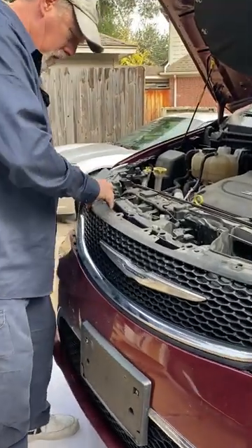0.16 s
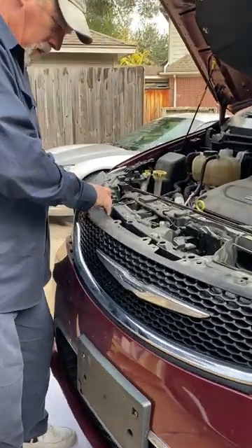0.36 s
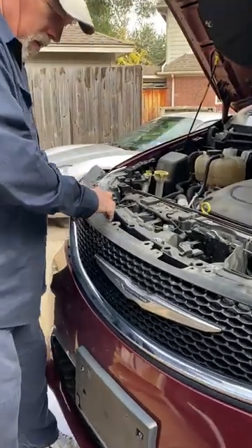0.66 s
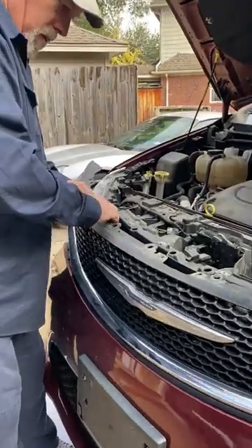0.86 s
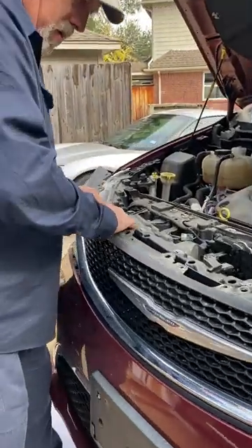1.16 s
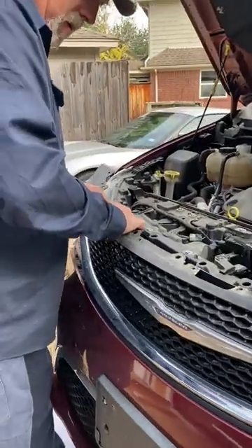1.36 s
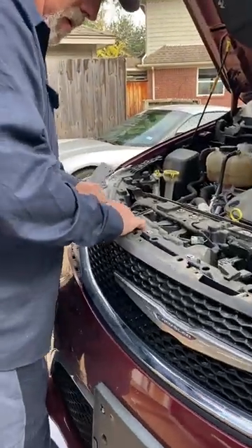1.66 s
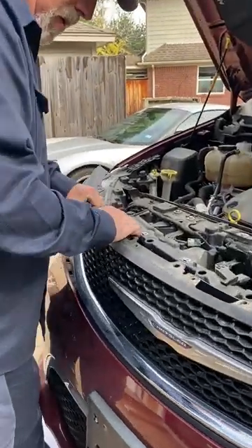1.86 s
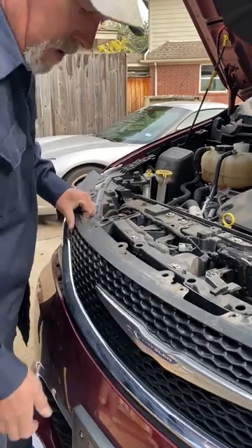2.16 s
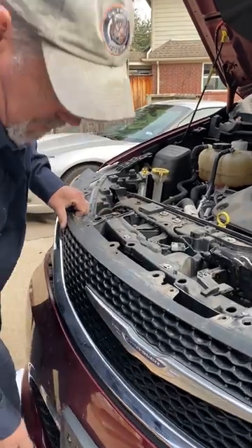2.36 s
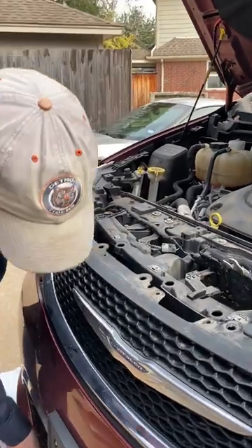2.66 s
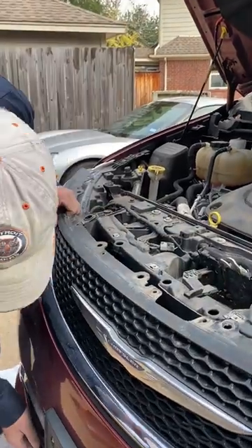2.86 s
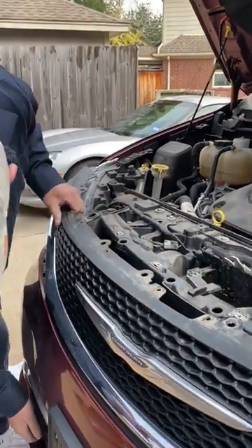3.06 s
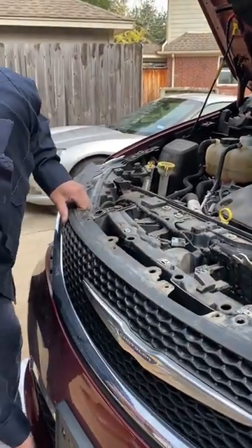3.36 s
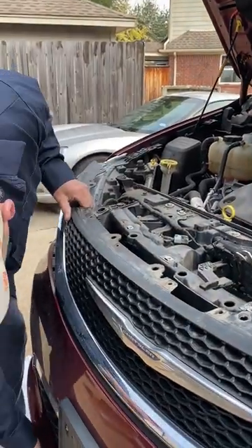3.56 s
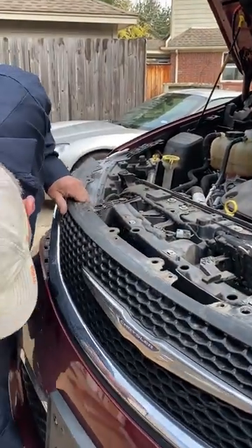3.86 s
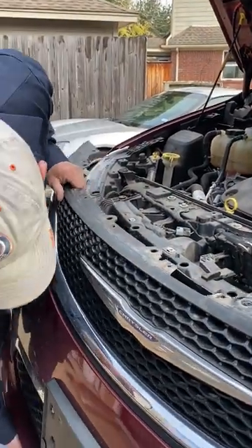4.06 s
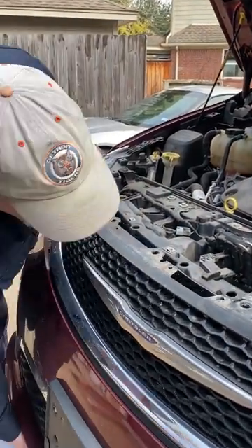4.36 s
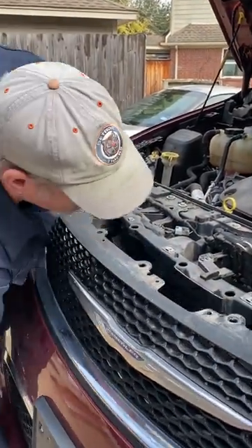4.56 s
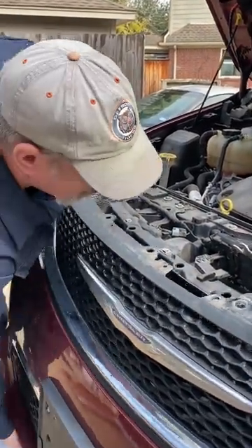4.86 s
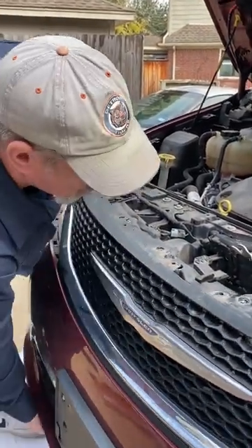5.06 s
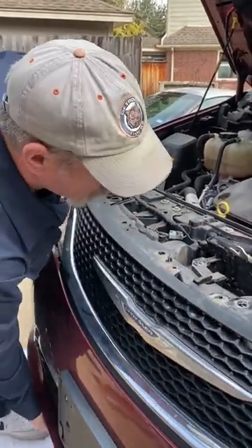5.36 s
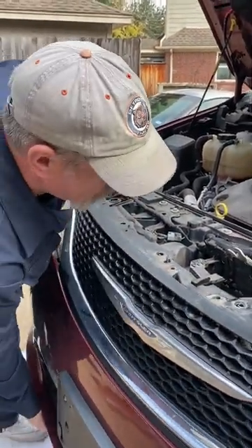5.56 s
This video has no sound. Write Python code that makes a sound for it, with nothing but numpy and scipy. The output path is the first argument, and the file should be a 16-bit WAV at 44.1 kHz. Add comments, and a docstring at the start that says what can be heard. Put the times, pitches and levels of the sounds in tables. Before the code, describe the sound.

Plastic clacks and drums as a panel is pressed onto a car's nose. Irregular single knocks, tiny clip ticks and sleeve rubs come first, with a quiet middle. Then hard cracks of snapping tabs, gritty edge scrapes and a final cluster of low hollow thuds and creaks. Outdoors, fairly dry, with distant traffic and a faint machine hum, heard nearby through a small stereo phone microphone.

```python
"""Open driveway: hands work a plastic bumper panel onto the nose of a car. Snapping tabs and knocks are bursts
of tiny impacts into panel modes; low notes drum in its hollow. Creak, rub and scrapes are coloured grain noise;
a loose edge ticks at random; faint tones glide. Far traffic rumbles as low noise that also carries the panel's
boom near 5.2 s, a machine hums as a wavering sine; a phone hears all through two close ports."""
import sys
import numpy as np
from scipy import signal
from scipy.fft import rfft, irfft
from scipy.io import wavfile
from scipy.ndimage import uniform_filter1d

SR = 44100
rng = np.random.default_rng(int(sys.argv[2]) if len(sys.argv) > 2 else 0)


def store_pcm(level_fs):
    """Save levels as 16-bit WAV."""
    pcm = np.round(np.clip(level_fs, -1, 1) * 32767).astype(np.int16)
    wavfile.write(sys.argv[1], SR, np.atleast_2d(pcm).T)


N = 252247

# low background: (time [s], deep rumble [dB], upper rumble [dB], machine hum [dB]); # the rumble is far
# traffic, and the upper band also carries the panel's boom near 5.2 s
BACKGROUND = [(0.0, -60, -44.5, -55.5), (0.54, -48.5, -55.5, -46), (1.4, -57, -45.5, -46.5),
              (1.72, -53, -56.5, -44), (2.47, -56.5, -45.5, -54.5), (2.85, -45.5, -49, -55.5),
              (3.95, -40.5, -53, -46), (4.33, -48.5, -44, -42), (4.65, -47, -61, -55), (5.19, -53, -29, -44),
              (5.4, -44, -44, -47), (5.72, -60, -40.5, -74)]
HUM_HZ, HUM_WIDTH_HZ = 115.4, 2.94

# creak level as the hands work the panel: (time [s], level [dB])
EFFORT = [(0.0, -49.5), (0.92, -53), (1.32, -53.5), (1.45, -52), (1.74, -57.5), (1.88, -47.5), (2.29, -52),
          (3.41, -56), (3.82, -50), (3.98, -44), (4.09, -46), (4.44, -45.5), (4.75, -49), (4.97, -42.5),
          (5.1, -38), (5.18, -27), (5.37, -45.5), (5.72, -46)]
REST_DB = -47.5   # creak with the hands at rest
AFTER_UNDER_PEAK_DB, AFTER_T60_S = 24, 0.33   # creak left behind by each knock
SWAY_UNDER_EFFORT_DB = 8
# spectrum of flexing plastic: (frequency [Hz], density [dB per Hz])
CREAK_SPECTRUM = [(76, -60), (130, -4), (193, -3.5), (229, -7), (384, -10.5), (1210, -19.5), (2840, -32.5),
                  (5000, -34), (6500, -39), (11000, -120)]
# spectrum of skin and cloth on plastic: (frequency [Hz], density [dB per Hz])
RUB_SPECTRUM = [(1500, 1.5), (2500, 1.5), (4000, 0), (6500, -5.5), (9000, -3), (11500, -9.5),
                (13000, -12.5), (16000, -22)]
RUB_DB, RUB_FOLLOWS = -65, 0.67   # rub at rest; dB of rub per dB of creak
# palms and sleeves sliding: (crest time [s], length [s], rub level [dB])
STROKES = [(0.215, 0.11, -58), (0.46, 0.25, -61.5), (0.701, 0.13, -53.5), (0.92, 0.067, -60.5),
           (1.36, 0.19, -76), (1.752, 0.023, -54), (1.92, 0.068, -50), (2.28, 0.28, -63),
           (2.77, 0.031, -73), (2.86, 0.15, -62), (2.995, 0.045, -59.5), (3.09, 0.021, -63),
           (3.515, 0.18, -64), (3.936, 0.35, -62.5), (4.182, 0.14, -61), (4.566, 0.035, -60),
           (4.723, 0.06, -53), (4.99, 0.42, -56.5), (5.158, 0.084, -63), (5.64, 0.064, -54)]
SWELL_RISE = 0.94   # rise of a stroke or scrape as a share of its fade

# panel modes, each row the centre of a crowd: (frequency [Hz], strength [dB], t60 [s])
PANEL = [(71.1, 12, 0.46), (114.5, 18, 0.089), (188.6, 14, 0.043), (241.7, 1, 0.064), (331.2, 6.5, 0.038),
         (479.4, -7.5, 0.058), (571.7, -6, 0.042), (723.5, 7, 0.03), (903, 10, 0.024), (1156, 5, 0.023),
         (1410, 2, 0.019), (1632, 3, 0.015), (1965, 4, 0.017), (2320, 5.5, 0.013), (2790, 2, 0.004),
         (3300, 12, 0.0043), (3870, 1, 0.0086), (4684, 9, 0.0082), (6033, 17, 0.0061), (7680, 16, 0.0023),
         (7400, -26, 0.0039), (8805, 2.5, 0.01), (10000, 20, 0.002), (9850, 3.5, 0.001),
         (12200, -10, 0.002), (13900, -11, 0.0043)]
CROWD = 9   # close modes per row

# panel contacts: (time [s], peak before knock gain [dB], thump [dB], knock [dB], crack [dB],
#                  favoured pitch [Hz], rattle t60 at 750 Hz [s])
KNOCKS = [(0.0419, -25.5, -20, -15.5, -21.5, 845, 0.052), (0.073, -48, -16, -15, -26, 500, 0.018),
          (0.1, -40, -13, -22, -25, 500, 0.017), (0.125, -24.5, -12, -13.5, -29, 332, 0.018),
          (0.1575, -18.5, -20, -8, -5, 2500, 0.019), (0.161, -14.5, -8.5, -5, -13.5, 320, 0.026),
          (0.218, -21, -28, -13, -7, 6000, 0.017), (0.223, -24, -15, -16, -22, 497, 0.026),
          (0.252, -29, 0.5, -13, -18, 495, 0.082), (0.34, -35.5, 1.5, -13, -7.5, 560, 0.072),
          (0.578, -29, -15, -6.5, -12.5, 865, 0.038), (0.599, -35.5, -13, -15, -8, 600, 0.052),
          (0.754, -37.5, -8.5, -15.5, -11.5, 338, 0.1), (1.111, -27.5, -21, -4.5, -10, 3900, 0.042),
          (1.117, -35, -1, -7, -22, 497, 0.03), (1.138, -33.5, -7, -30, -35, 195, 0.022),
          (1.301, -14, -18, -5.5, -7, 2340, 0.044), (1.308, -17, -18, -16.5, -14, 500, 0.036),
          (1.314, -21, -13, -13, -14, 6000, 0.013), (1.343, -26.5, -10, -8, -38, 318, 0.065),
          (1.695, -24, -22.5, -37, -31.5, 1160, 0.021), (1.722, -35, -1, -27, -34, 900, 0.033),
          (1.746, -28.5, -16.5, -29, -34, 1100, 0.02), (1.765, -24, -14, -11, -22, 1200, 0.021),
          (1.776, -34.5, -8, -4, -26, 700, 0.022), (1.882, -41.5, -23, -6, -14, 2500, 0.02),
          (1.895, -33, -23, -34, -37, 347, 0.016), (1.933, -31, -14, -33, -15, 358, 0.018),
          (1.948, -23, -14, -32, -48, 640, 0.09), (1.97, -17, -16, -9, -8, 480, 0.04),
          (1.999, -31, -18, -8, -30, 210, 0.025), (2.149, -37.5, -29, -7, -17, 254, 0.04),
          (2.559, -24.5, -21, -16, -15, 774, 0.02), (2.749, -38, -7, -11.5, -15, 780, 0.038),
          (2.806, -44, -23, 5, 4, 3000, 0.015), (2.853, -40, 1, -27, -27, 414, 0.015),
          (2.969, -47.5, -26, -19, -22, 800, 0.022), (3.15, -34.5, -15, -18, -20.5, 420, 0.046),
          (3.391, -38.5, 16, -6, -8, 195, 0.045), (3.783, -31.5, -11.5, -21, -33, 352, 0.051),
          (3.865, -14.5, -12.5, -10.5, -4, 278, 0.02), (3.881, -24, -10, -11, -15, 240, 0.027),
          (3.9004, -10, -17, -5.5, -7.5, 2470, 0.028), (3.973, -30, -20, -14, -13, 4000, 0.022),
          (3.977, -22, -2, -16, -25, 323, 0.022), (3.987, -31.5, -14, -13, -15, 305, 0.026),
          (4.027, -29.5, -11, -24, -52, 270, 0.028), (4.072, -26.5, -11, -26, -42, 342, 0.018),
          (4.116, -36.5, -6, -10, -16, 500, 0.013), (4.155, -3, -11, -11.5, -10, 526, 0.03),
          (4.173, -7, -24.5, -5, -2, 440, 0.011), (4.184, -26, -10, -10, -10, 500, 0.018),
          (4.207, -18, 2, 5, -6, 2000, 0.0073), (4.254, -20.5, -6.5, -5.5, -4.5, 270, 0.049),
          (4.2704, -26.5, 4, 1.5, -4, 2000, 0.02), (4.291, -31, 3, -5, -13, 2200, 0.02),
          (4.31, -12, -2.5, 12, 10.5, 1750, 0.0029), (4.365, -29, 0, -4, -26, 325, 0.063),
          (4.413, -30, 0.5, 3, -28, 1790, 0.0033), (4.426, -27.5, -15, -9.5, -32, 1820, 0.0046),
          (4.456, -34.5, -2, -7, -28, 1000, 0.02), (4.516, -26.5, -38, -23, -31, 1110, 0.016),
          (4.525, -34, -22, -22, -25, 1000, 0.017), (4.5396, -24, -18, -9, -23, 1290, 0.0098),
          (4.5648, -14.5, -39, -4, -8, 1430, 0.0098), (4.567, -5.5, -43, -5, 4, 6000, 0.016),
          (4.579, -24, -25, 1, -12, 1600, 0.03), (4.597, -32, 6, -17, -21, 250, 0.012),
          (4.682, -33.5, -19, -26, -16, 358, 0.024), (4.71, -19.5, -13, -5.5, -10, 350, 0.023),
          (4.914, -46, -20, -5, -25, 1500, 0.012), (4.92, -23.5, -14, -22, -50, 655, 0.033),
          (4.954, -12, -34, -12, -25, 640, 0.026), (4.985, -23, -14, -24, -43, 202, 0.018),
          (5.03, -21.5, -7, -17, -22, 250, 0.023), (5.037, -14.5, -13, -20, -28, 700, 0.015),
          (5.044, -19, -8, -25, -28, 400, 0.018), (5.05, -16.5, 1, -25, -34, 250, 0.025),
          (5.0625, -16, -12, -16, -21, 500, 0.026), (5.069, -15.5, -23, -32, -37, 440, 0.021),
          (5.085, -20, -2, -27, -32, 267, 0.038), (5.119, -17.5, -26, -5, -7.5, 900, 0.015),
          (5.125, -8, -17.5, -24, -25, 506, 0.013), (5.131, -18, -12, -33, -18, 383, 0.054),
          (5.152, -16.5, -13, -20, -9.5, 3570, 0.041), (5.179, -14, -8, -10.5, -11.5, 670, 0.062),
          (5.189, -27, -10, -5.5, -9, 202, 0.014), (5.223, -21.5, 4, -6, -29, 360, 0.035),
          (5.244, -26.5, -15, -3, -7, 3200, 0.023), (5.258, -26, -15, 4, -7, 3200, 0.026),
          (5.307, -23, -4, -20, -13, 646, 0.025), (5.318, -11.5, -7.5, -9.5, -11, 370, 0.041),
          (5.363, -26, -8, -1, -17, 2100, 0.021), (5.414, -26.5, 1, -36, -31, 253, 0.13),
          (5.49, -36, -10, -18, -16, 700, 0.015), (5.502, -23.5, -3.5, -6, -1, 630, 0.027),
          (5.513, -32, 15, -22, -30, 322, 0.012), (5.58, -23.5, -12, -17, -24, 564, 0.033),
          (5.583, -17, -16.5, -19, -13.5, 564, 0.053), (5.601, -21, -23, -11.5, -29, 500, 0.062),
          (5.649, -24.5, 4, -30, -18, 225, 0.0088)]
# centres of boom, thump, body, knock, crack and fizz: (frequency [Hz])
COLOUR_HZ = [110, 280, 750, 2100, 5000, 10000]
BODY_DB, BOOM_DB, FIZZ_UNDER_CRACK_DB = -12, -29.5, 10   # same for every knock
FIZZ_PER_DB = 0.1267   # harder knocks fizz more
# light bright ticks of the small clips: (time [s], peak before knock gain [dB])
TICKS = [(0.877, -50), (0.8949, -36.5), (1.039, -44.5), (1.0683, -41), (1.086, -43), (1.2003, -45),
         (1.2127, -44), (1.228, -47), (1.28, -44), (1.87, -43.5), (2.624, -35), (2.9326, -36.5),
         (3.52, -49), (4.143, -39), (4.467, -44), (4.6384, -33), (4.739, -32.5), (4.903, -34.5)]
# colour of those ticks, one per COLOUR_HZ: (level [dB])
TICK_COLOUR_DB = [-4, -34, -29, -11.5, -9, -4.5]
TICK_PITCH_HZ, TICK_RATTLE_S = 4640, 0.013
RISE_SHARE = 0.06   # rise time constant as a share of the rattle
FIRST_BLOW_S, FIRST_BLOW_DB = 0.0008, -5.5   # delay; level against the whole chatter
CRISP_RATTLE_S = 0.02   # longer rattles have a softer first blow
TREBLE_DIES_SOONER = 0.056   # power of frequency by which the rattle shortens
FAVOUR_DB, FAVOUR_OCTAVES = 7, 0.3   # lift near a low favoured pitch; its width
EVEN_ABOVE_HZ = 650   # higher modes alternate in sign and blend into an even clack

# plastic edges scraping: (crest time [s], length [s], dull level [dB], bright level [dB])
SCRAPES = [(0.079, 0.023, -47, -60), (0.148, 0.041, -42, -52), (0.203, 0.064, -40.5, -47.5),
           (0.24, 0.066, -39.5, -55), (1.15, 0.049, -50.5, -66), (1.33, 0.027, -35.5, -40.5),
           (1.364, 0.073, -46, -52.5), (1.73, 0.058, -52, -73), (1.779, 0.043, -46.5, -67),
           (1.9, 0.03, -49.5, -74), (1.942, 0.023, -36, -49), (1.985, 0.082, -44.5, -53.5),
           (2.584, 0.049, -49, -59), (3.862, 0.014, -44, -41), (3.914, 0.031, -41.5, -40),
           (3.988, 0.032, -33, -47), (4.176, 0.033, -36, -29.5), (4.283, 0.12, -46, -50.5),
           (4.37, 0.039, -45, -55), (4.451, 0.042, -47.5, -73), (4.51, 0.026, -44, -54.5),
           (4.548, 0.018, -37, -49), (4.557, 0.0086, -50, -41), (4.579, .02, -53, -50),
           (4.586, 0.055, -61, -53), (4.712, 0.015, -50, -38.5), (4.732, 0.065, -43, -61),
           (4.935, 0.028, -39, -59), (4.976, 0.046, -34.5, -48), (5.031, 0.038, -32, -44),
           (5.07, 0.021, -24.5, -36), (5.128, 0.019, -23.5, -40), (5.157, 0.014, -24, -31.5),
           (5.175, 0.054, -30, -51), (5.263, 0.022, -36, -46), (5.323, 0.01, -23, -24),
           (5.351, 0.043, -32.5, -63), (5.603, 0.015, -43, -39), (5.635, 0.025, -31.5, -48),
           (5.667, 0.054, -44.5, -61)]
# dull scrape spectrum: (frequency [Hz], density [dB per Hz])
DULL_SPECTRUM = [(250, 6), (500, 6), (1000, 1), (2000, -11.5), (3000, -16), (6000, -47)]
# bright scrape spectrum: (frequency [Hz], density [dB per Hz])
BRIGHT_SPECTRUM = [(1500, -2), (2500, 5.5), (4000, 2.5), (6000, -5), (9000, -9.5), (12000, -22),
                   (14000, -40)]

# hollow of the panel drumming under a palm: (time [s], peak [dB], starting pitch [Hz], t60 [s])
DRUMS = [(0.1657, -12, 332, 0.065), (1.115, -27.5, 240, 0.038), (1.141, -31, 190, 0.04),
         (1.313, -23, 390, 0.039), (1.897, -31.5, 342, 0.014), (1.934, -24.5, 365, 0.041),
         (4.157, -10, 492, 0.013), (4.922, -19, 650, 0.021), (4.957, -15, 634, 0.028),
         (5.067, -24, 407, 0.024), (5.124, -13, 443, 0.041), (5.513, -30, 307, 0.15),
         (5.582, -20, 540, 0.05), (5.602, -23, 544, 0.037)]
DRUM_RISE_CYCLES, DRUM_SAG = 0.37, 0.041   # swing-up time; share by which the note sinks

# far bird and squeak of plastic: (time [s], length [s], from [Hz], to [Hz], level [dB])
WHISTLES = [(1.46, 0.15, 5480, 5400, -79), (2.254, 0.15, 1264, 1157, -61)]

YARD_DB, YARD_T60_S, YARD_CUT_HZ = -19, 0.13, 3800

# level of left port over right: (frequency [Hz], level [dB])
LEAN = [(100, 0), (300, -.5), (600, -2.5), (1500, 0), (4200, -1.5), (6400, 0), (15000, 0)]
# phase lead of left port over right: (frequency [Hz], phase [rad])
LEAD = [(0, -.045), (170, -.07), (260, -.13), (480, -.45), (1300, -.4), (1700, -.2), (2200, .4), (2900, .9),
        (4500, .6), (5500, .95), (6900, 2.9), (8000, 3.6), (9900, 6.1), (11200, 6.4), (12800, 9.2),
        (14600, 9.5), (16400, 12)]
# likeness of the ports for blows on the panel: (frequency [Hz], share heard alike [0-1])
ALIKE_PANEL = [(180, 1.0), (260, .985), (350, .96), (650, .88), (1200, .87), (1650, .92), (2200, .65),
               (2800, .42), (4500, .52), (5500, .88), (6500, .97), (16000, .93)]
# likeness of the ports for sounds from all around: (frequency [Hz], share heard alike [0-1])
ALIKE_SPREAD = [(160, 1.0), (260, .96), (350, .86), (470, .78), (650, .6), (1200, .56), (1650, .74),
                (2200, .77), (2800, .48), (4500, .64), (5500, .78), (6500, .93), (16000, .93)]
CUTOFF_HZ = 16800


def amp(db):
    """Amplitude of a level in dB."""
    return 10 ** (np.asarray(db) / 20)


def rms_one(x):
    """Scale to rms 1."""
    return x / np.sqrt(np.mean(x ** 2) + 1e-20)


def in_time(rows):
    """Each column of a timed table as a curve over the scene."""
    s, *columns = np.transpose(rows)
    return [np.interp(np.arange(N) / SR, s, c) for c in columns]


def at_hz(points, hz):
    """Table read along log frequency."""
    hz_points, values = np.transpose(points)
    return np.interp(np.log(hz + 1), np.log(hz_points + 1), values)


def drift(rate_hz):
    """Slow random curve with spread 1."""
    knots_hz = 100
    knots = rng.standard_normal(int(N / SR * knots_hz) + 2)
    smooth = uniform_filter1d(knots, max(1, int(50 / rate_hz)))
    return np.interp(np.arange(N) / SR * knots_hz, np.arange(len(knots)), rms_one(smooth))


def grains(shape, spread_db):
    """Noise whose samples differ widely in size: a stream of tiny impacts."""
    noise = rng.standard_normal(shape)
    return noise * amp(spread_db * np.minimum(rng.exponential(1, shape), 6))


def coloured(x, spectrum):
    """Noise takes a spectrum; rms 1."""
    hz = np.fft.rfftfreq(N, 1 / SR)
    gain = amp(at_hz(spectrum, hz)) * (hz > spectrum[0][0])
    return rms_one(irfft(rfft(x) * gain, N))


def swells(rows):
    """Power of summed bell swells (crest, length, dB) that rise a little faster than they fade."""
    t = np.arange(N) / SR
    power = np.zeros(N)
    for s, length_s, db in rows:
        width_s = length_s * np.where(t < s, SWELL_RISE, 1)
        power += amp(2 * db) * np.exp(-(2 * (t - s) / width_s) ** 2)
    return power


def background():
    """Two bands of low rumble, far traffic with the panel's boom swelling the upper one near 5.2 s, and a
    machine hum wavering in pitch and level."""
    deep_db, upper_db, hum_db = in_time(BACKGROUND)
    white = rng.standard_normal((3, N))
    deep = coloured(white[0], [(22, -3), (33, 1.0), (45, 29.0), (60, 29.5), (80, -70)])
    upper = coloured(white[1], [(40, -11), (62, 2.0), (95, 9.5), (135, -5.0), (200, -6.0), (400, -78)])
    hum_hz = HUM_HZ + HUM_WIDTH_HZ * drift(7.8)
    hum = np.sqrt(2) * np.sin(2 * np.pi * np.cumsum(hum_hz) / SR)
    return amp(deep_db) * deep + amp(upper_db) * upper + amp(hum_db + 0.54 * drift(6)) * hum


def creaking():
    """Creak level in dB: the effort plus, in power, a dying creak after every knock."""
    effort_db, = in_time(EFFORT)
    blows = np.zeros(N)
    for s, peak_db, *_ in KNOCKS:
        blows[round(s * SR)] += amp(2 * (peak_db - AFTER_UNDER_PEAK_DB))
    decay = amp(2 * -60 / (AFTER_T60_S * SR))
    after = signal.lfilter([1], [1, -decay], blows + 1e-18)
    return 10 * np.log10(amp(2 * effort_db) + uniform_filter1d(after, size=882))   # 20 ms


def rubbing(creak_db):
    """Rub level in dB: a fine rub that follows the creak and swells for the strokes."""
    steady_db = RUB_DB + RUB_FOLLOWS * (creak_db - REST_DB)
    return 10 * np.log10(amp(2 * steady_db) + swells(STROKES))


def handling(creak_db, rub_db):
    """Flexing plastic creaks in clumps of grains; skin and cloth hiss finely."""
    creak = coloured(grains((2, N), spread_db=2.5) * amp(1.5 * drift(15)), CREAK_SPECTRUM)
    rub = coloured(grains((2, N), spread_db=2.0) * amp(1 * drift(25)), RUB_SPECTRUM)
    return amp(creak_db) * creak + amp(rub_db) * rub


def sway(creak_db):
    """Low noise boom of the whole bumper moving on its mounts, under the creak."""
    boom = coloured(rng.standard_normal(N), [(45, -16), (80, -8.0), (130, 16), (220, -32)])
    return amp(creak_db - SWAY_UNDER_EFFORT_DB) * boom


def panel_modes(soft_s=0.0061, soft_hz=500):
    """Pitch, strength and decaying sine of every mode; low modes take time to swing up."""
    hz, mode_db, t60 = np.repeat(PANEL, CROWD, axis=0).T
    hz = hz * 2 ** np.tile(np.linspace(-.14, .14, CROWD), len(PANEL))   # octaves about the row
    t = np.arange(4096) / SR
    rings = np.sin(2 * np.pi * hz[:, None] * t) * amp(-60 * t / t60[:, None])
    rings *= 1 - np.exp(-t / soft_s * (hz[:, None] / soft_hz) ** 2)
    return hz, mode_db, rings


def scrabble(creak_db, per_s=210.0, gain_db=-4.0, growth=0.035, tilt_db_per_octave=-4.0):
    """The loose edge ticks its mounts at random into the modes, louder the harder it is worked."""
    hz, mode_db, rings = panel_modes()
    signs = rng.choice([-1, 1], (2, len(hz)))
    body = signs * amp(mode_db + tilt_db_per_octave * np.log2(hz / 500)) @ rings
    ticks = (rng.random(N) < per_s / SR) * grains(N, spread_db=5.5)
    ticks = signal.lfilter([1], [1, -1.5, .5625], ticks)   # soft plastic contacts carry little treble
    sound = rms_one(signal.fftconvolve(ticks[None], body, axes=1)[:, :N])
    return amp(creak_db + gain_db + growth * (creak_db + 42.0)) * sound


def contacts():
    """Every contact as time, peak, six colour levels, pitch and rattle."""
    for s, peak_db, thump_db, knock_db, crack_db, pitch_hz, rattle_s in KNOCKS:
        fizz_db = crack_db - FIZZ_UNDER_CRACK_DB + FIZZ_PER_DB * (peak_db + 30.0)
        colour_db = [BOOM_DB, thump_db, BODY_DB, knock_db, crack_db, fizz_db]
        yield s, peak_db, colour_db, pitch_hz, rattle_s
    for s, peak_db in TICKS:
        yield s, peak_db, TICK_COLOUR_DB, TICK_PITCH_HZ, TICK_RATTLE_S


def knocks(gain_db=1.0, dry_hz=1300, spread_db=3.5, uneven_db=2.66):
    """A first blow and a dying chatter of tiny impacts drive the panel's modes, by two paths."""
    hz, mode_db, rings = panel_modes()
    t = np.arange(rings.shape[1]) / SR
    bands_hz = np.array(COLOUR_HZ)
    # overlapping triangles: share of each mode in each colour
    shares = np.array([np.interp(np.log(hz), np.log(bands_hz), peak) for peak in np.eye(len(bands_hz))])
    shape = (len(KNOCKS) + len(TICKS), 2, len(hz))
    signs = np.where(hz > EVEN_ABOVE_HZ, (-1) ** np.arange(len(hz)), rng.choice([-1, 1], shape))
    signs = signs * amp(uneven_db * rng.standard_normal(shape))
    out = np.zeros((2, N + 2 * len(t)))
    for (s, peak_db, colour_db, pitch_hz, rattle_s), sign in zip(contacts(), signs):
        nearness = np.exp(-.5 * (np.log2(hz / pitch_hz) / FAVOUR_OCTAVES) ** 2)
        favoured_db = FAVOUR_DB / (1 + (pitch_hz / dry_hz) ** 2) * nearness
        strengths = sign[:, None] * shares * amp(mode_db + favoured_db)

        lasts_s = rattle_s * (bands_hz[:, None] / bands_hz[2]) ** -TREBLE_DIES_SOONER
        lasts_s = np.clip(lasts_s, .002, .2)
        envelope = (1 - np.exp(-t / (RISE_SHARE * lasts_s))) * amp(-60 * t / lasts_s)
        chatter = grains((2, 1, len(t)), spread_db) * envelope
        chatter /= np.sqrt(np.sum(chatter ** 2, axis=2, keepdims=True))
        first_blow = amp(FIRST_BLOW_DB) * np.sqrt(CRISP_RATTLE_S / lasts_s[:, 0])
        chatter[:, :, round(FIRST_BLOW_S * SR)] += first_blow

        parts = signal.fftconvolve(chatter, strengths @ rings, axes=2)
        parts /= np.max(np.abs(parts), axis=2, keepdims=True)   # equal peaks, then weighed by colour
        sound = amp(colour_db) @ parts
        sound /= np.max(np.abs(sound), axis=1, keepdims=True)
        at = round(s * SR)
        out[:, at:at + sound.shape[1]] += amp(peak_db + gain_db) * sound
    return out[:, :N]


def scrapes(grit_db=2.5, lumpy_db=5.0):
    """Edge over edge: dense uneven grit under each swell, in a dull and a bright colour."""
    s, length_s, *levels = np.transpose(SCRAPES)
    out = np.zeros((2, N))
    for db, spectrum in zip(levels, [DULL_SPECTRUM, BRIGHT_SPECTRUM]):
        envelope = np.sqrt(swells(zip(s, length_s, db))) * amp(lumpy_db * drift(50))
        out += envelope * coloured(grains((2, N), grit_db), spectrum)
    return out


def drums():
    """The hollow sounds one sine that swings up, sinks a little in pitch and dies."""
    out, t = np.zeros(N + SR), np.arange(SR // 5) / SR
    for s, peak_db, hz, t60 in DRUMS:
        swing = (1 - np.exp(-t * hz / DRUM_RISE_CYCLES)) ** 2 * amp(-60 * t / t60)
        sinking_hz = hz * (1 - DRUM_SAG * np.tanh(2 * t / t60))
        note = np.sin(2 * np.pi * np.cumsum(sinking_hz) / SR)
        out[round(s * SR):][:len(t)] += amp(peak_db) * note * swing / swing.max()
    return out[:N]


def whistles():
    """Soft-edged sines gliding down, a little unsteady in pitch and level."""
    out, waver, breath = np.zeros(N), drift(20), amp(3.8 * drift(50))
    for s, length_s, from_hz, to_hz, db in WHISTLES:
        at, part = round(s * SR), np.linspace(0, 1, round(length_s * SR))
        hz = (from_hz + (to_hz - from_hz) * part) * (1 + 0.008 * waver[at:at + len(part)])
        envelope = np.sqrt(2 * np.abs(np.sin(np.pi * part)))
        out[at:at + len(part)] += amp(db) * envelope * np.sin(2 * np.pi * np.cumsum(hz) / SR)
    return out * breath


def yard(x):
    """Bonnet, fence and house walls send back a short dull tail of decaying noise."""
    t = np.arange(round(.4 * SR)) / SR
    tail = rng.standard_normal((2, len(t))) * amp(-60 * t / YARD_T60_S) * (t > .004)
    tail = signal.sosfilt(signal.butter(1, YARD_CUT_HZ, fs=SR, output="sos"), tail)
    tail /= np.sqrt(np.sum(tail ** 2, axis=1, keepdims=True))
    return amp(YARD_DB) * signal.fftconvolve(x, tail, axes=1)[:, :N]


def ports(common, differing, likeness):
    """Sum of what both ports hear alike and opposed; the treble leads in the left port."""
    hz = np.fft.rfftfreq(N, 1 / SR)
    alike = np.clip(at_hz(likeness, hz), 0, 1)
    side = np.array([[1], [-1]])   # left, right
    same = np.sqrt((1 + alike) / 2) * rfft(common)
    opposed = side * np.sqrt((1 - alike) / 2) * rfft(differing)
    lead_rad = np.interp(hz, *np.transpose(LEAD))
    tilt = amp(side * at_hz(LEAN, hz) / 2) * np.exp(.5j * side * lead_rad)
    return irfft((same + opposed) * tilt, N)


def scene():
    """Panel contacts with their yard tail, plus sounds from all around, at two ports."""
    creak_db = creaking()
    panel = knocks() + scrapes() + drums() * [[1], [0]]   # drums are common to both ports
    spread = scrabble(creak_db) + handling(creak_db, rubbing(creak_db))
    spread[0] += sway(creak_db) + whistles() + background()
    return ports(*(panel + yard(panel)), ALIKE_PANEL) + ports(*spread, ALIKE_SPREAD)


def record(dry):
    """Peaks are rounded, the top is cut."""
    rounded = 1.557 * np.tanh(dry / 1.466)
    return signal.sosfilt(signal.cheby2(12, 70, CUTOFF_HZ, fs=SR, output="sos"), rounded)


dry = scene()
out = record(dry)
store_pcm(out)
```